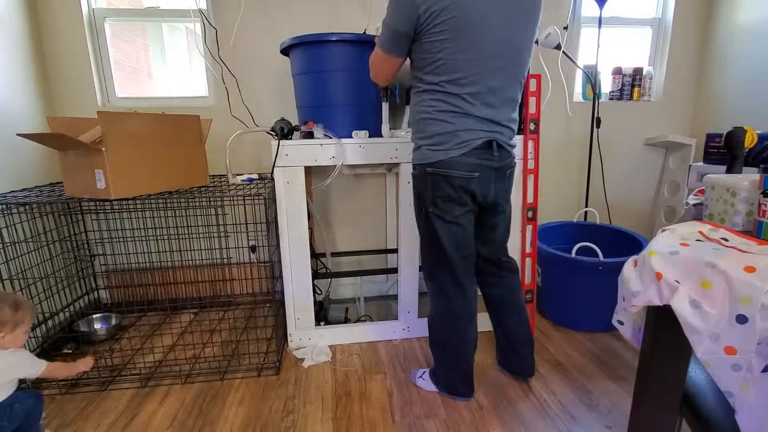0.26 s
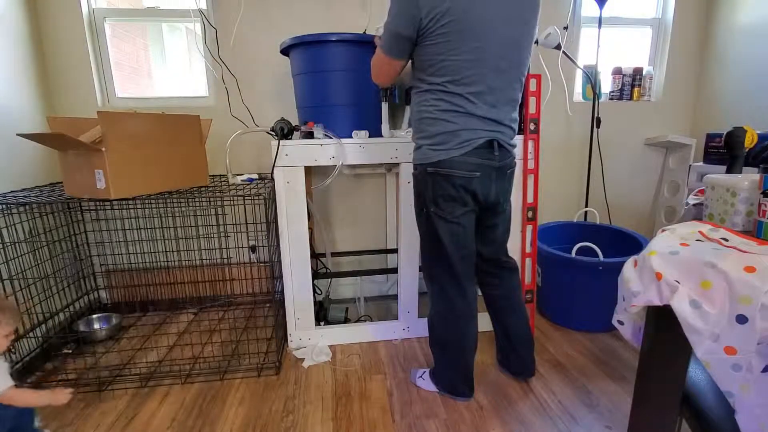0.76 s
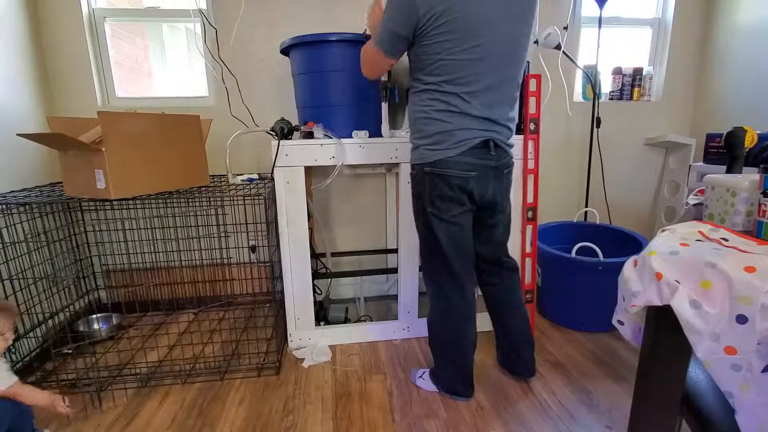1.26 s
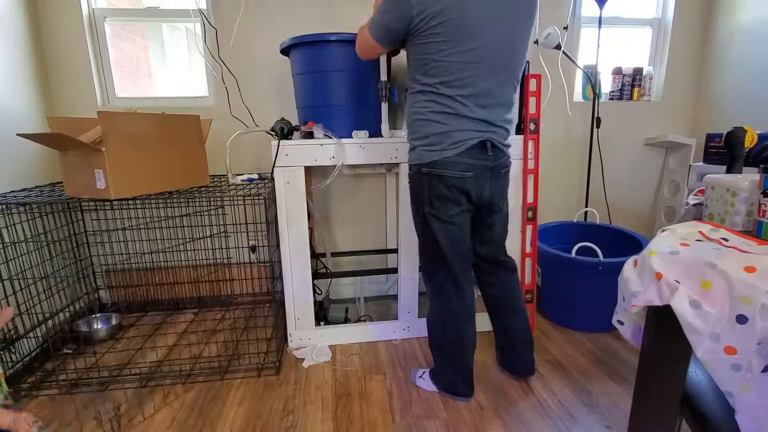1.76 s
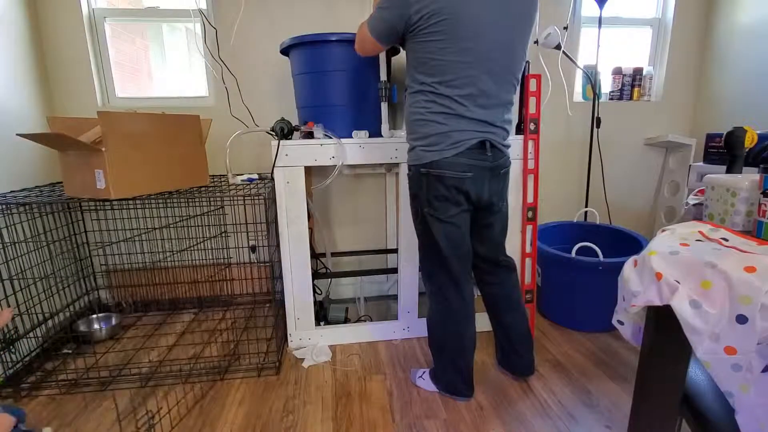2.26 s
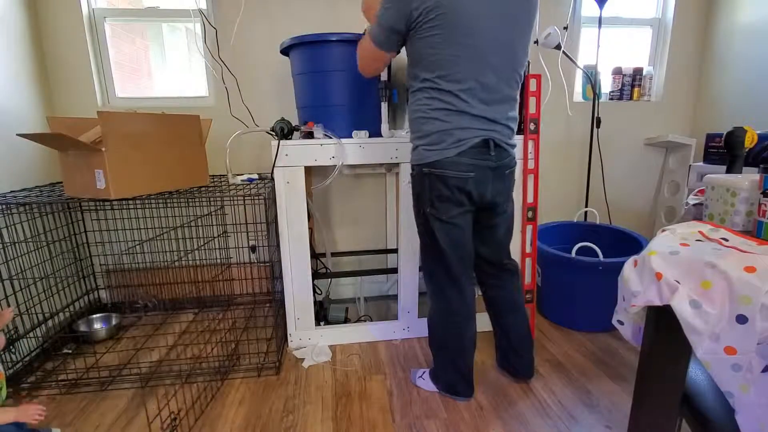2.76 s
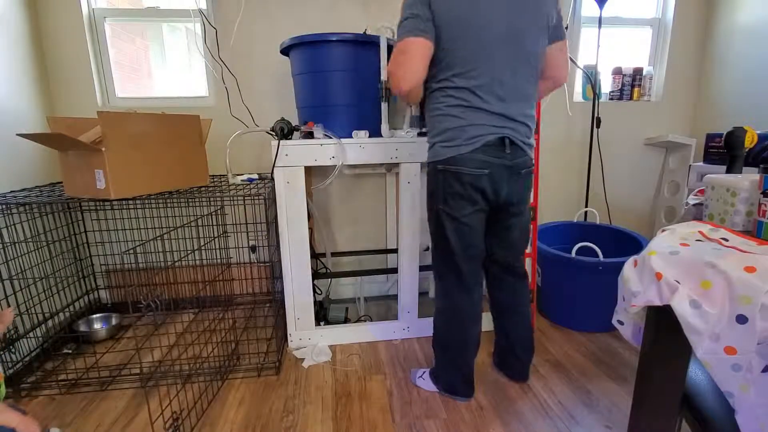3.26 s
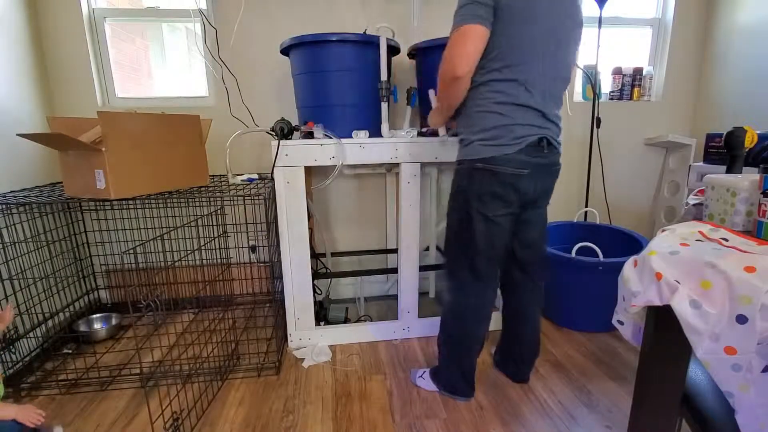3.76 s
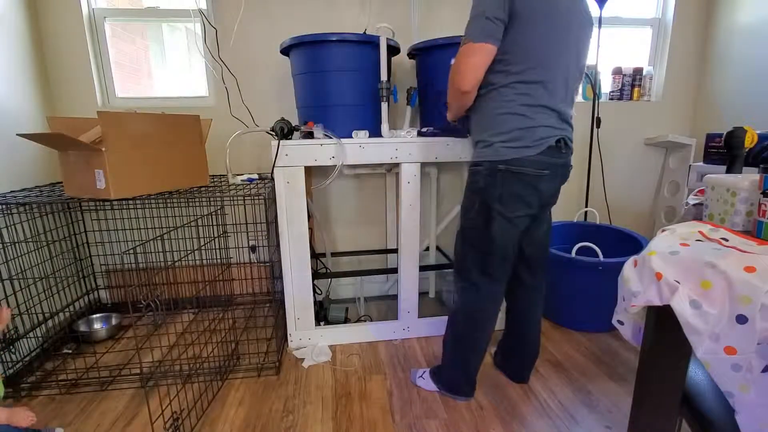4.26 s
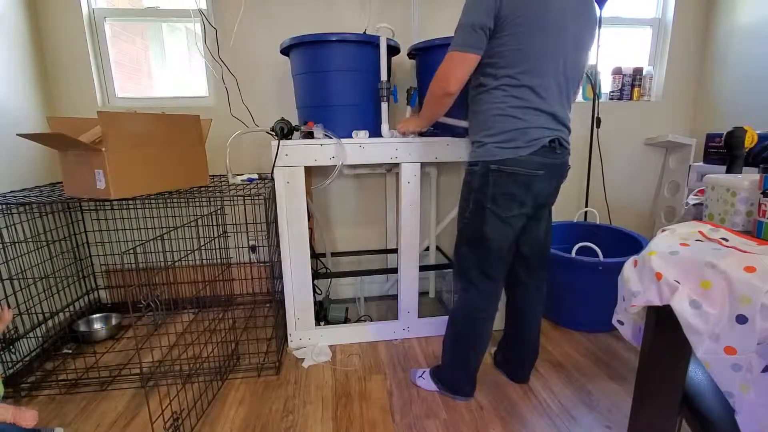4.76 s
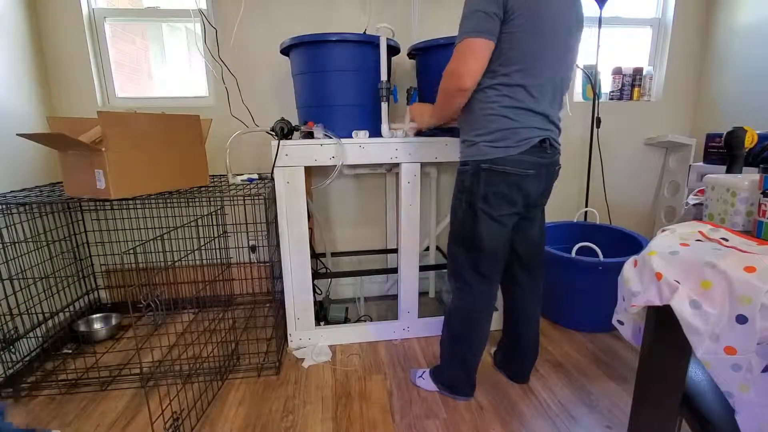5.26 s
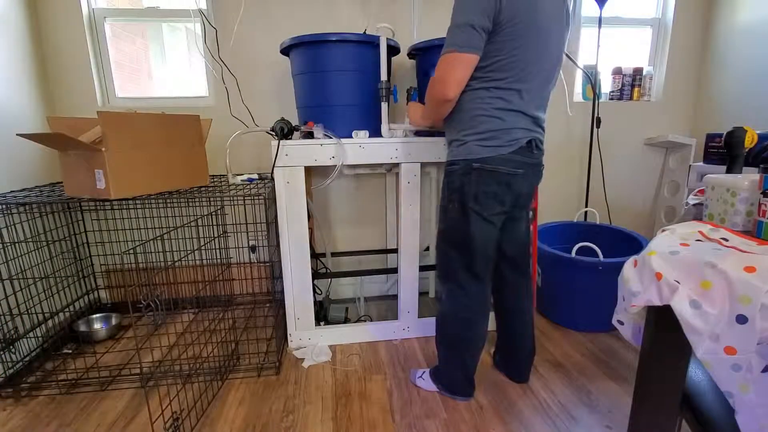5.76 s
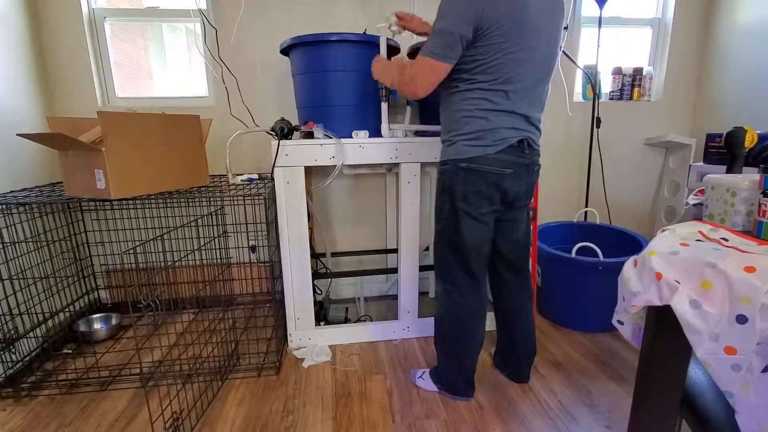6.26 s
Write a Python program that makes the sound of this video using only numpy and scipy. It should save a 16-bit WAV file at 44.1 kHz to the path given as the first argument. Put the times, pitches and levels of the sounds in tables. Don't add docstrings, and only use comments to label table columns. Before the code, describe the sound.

Rigid plastic pipes and fittings knock and clack onto a wooden stand in a bare lively room, with scuffing hands and a faint pump hum.

```python
import sys
import numpy as np
from scipy import signal
from scipy.fft import rfft, irfft
from scipy.io import wavfile
from scipy.ndimage import uniform_filter1d

SR = 44100
rng = np.random.default_rng(int(sys.argv[2]) if len(sys.argv) > 2 else 0)


def level_to_linear(level):
    exponent = np.asarray(level, float) / 20
    return 10 ** exponent


def transcribe(signal):
    frames = np.atleast_2d(signal).T
    limited = np.clip(frames, -1, 1)
    pcm = np.round(limited * 32767).astype(np.int16)
    wavfile.write(sys.argv[1], SR, pcm)


N = 287532

# (frequency [Hz], likeness [0-1])
CHANNEL_LIKENESS = [(60, 0.99), (200, 0.97), (500, 0.86), (900, 0.32), (1300, 0.081), (2000, 0.059),
                    (8000, .05), (15000, 0.034)]
HEAVY_EDGES_HZ = [100, 350, 1300, 3000, 8000]
TICK_EDGES_HZ = [1000, 2000, 3600, 6500, 13000]
# (level at zero hardness [dB], slope [dB per dB of hardness])
TICK_TOP = [(-0.8, 1.05), (-9, 0.19)]


def rms_one(x):
    return x / np.sqrt(np.mean(x ** 2) + 1e-30)


def at_hz(points, hz):
    table_hz, values = np.array(points).T
    return np.interp(np.log(hz), np.log(table_hz), values)


def band(x, low, high, order=2):
    return signal.sosfilt(signal.butter(order, [low, high], "band", fs=SR, output="sos"), x)


def drift(rate):
    r = np.exp(-80 * np.pi * rate / SR)
    steps = rng.standard_normal(N // 40 + 2002)
    slow = signal.lfilter([1], [1, -2 * r, r * r], steps)[2000:]
    return np.interp(np.arange(N) / 40, np.arange(len(slow)), rms_one(slow))


def swells(rows, floor_db):
    t = np.arange(0, N + 32, 32) / SR
    s, peak_db, rise_s, fall_s = np.transpose(rows)[:, :, None]
    level_db = peak_db - 20 * np.maximum((s - t) / rise_s, (t - s) / fall_s)
    return np.maximum(np.interp(np.arange(N) / SR, t, level_db.max(axis=0)), floor_db)


def diffuse(pairs, gain_db, first=0):
    edges_hz = 25 * 2 ** np.arange(0, 9.6, .5)
    # (frequency [Hz], left over right [dB])
    left_lean = [(60, 0.7), (180, 0.9), (550, 1), (1650, 0.3), (4970, 0.8), (15000, -1)]
    out = 0
    for k, (low, high) in enumerate(zip(edges_hz[first:], edges_hz[first + 1:])):
        mid, side = band(pairs[k % 2], low, high)
        hz = np.sqrt(low * high)
        alike = np.clip(at_hz(CHANNEL_LIKENESS, hz), 0, 1)
        lean = level_to_linear(at_hz(left_lean, hz) / 2 * np.array([[1], [-1]]))
        stereo = np.sqrt(1 + alike) * mid + np.sqrt(1 - alike) * side * [[1], [-1]]
        out = out + lean * level_to_linear(gain_db(hz)) * stereo
    return out


def room_level():
    # (time [s], level [dB])
    level_points = [(0.0, -38), (0.27, -40.5), (1.01, -42.5), (1.49, -40), (2.2, -41), (2.5, -40),
                    (2.91, -41.5), (4.1, -43), (4.65, -43.5), (4.83, -45.5), (5.9, -45.5), (6.52, -43.5)]
    s, level_db = np.transpose(level_points)
    return np.interp(np.arange(N) / SR, s, level_db)


def room_noise(level_db):
    # (frequency [Hz], level [dB per Hz])
    noise_spectrum = [(15, -56), (28, -54), (46, -2.5), (107, -3), (189, -7), (261, -15.5), (324, -13.5),
                      (352, -1), (486, -19), (527, -4), (620, -12.5), (769, -14), (1930, -40),
                      (2890, -38.5), (15800, -49.5)]
    # (peak time [s], peak level [dB], rise [s], fall [s])
    shakes = [
        (0.63, -35, 1.2, 1),
        (3.9, -30.5, 0.32, 0.12),
        (5.48, -32.5, 0.42, 0.21),
    ]
    lumps = drift(1.3)

    def gain_db(hz):
        return at_hz(noise_spectrum, hz) + 2.0 * lumps * (hz < 300) + 1.4 * drift(9)

    noise = diffuse(rng.standard_normal((2, 2, N)), gain_db)
    return level_to_linear(swells(shakes, level_db)) * rms_one(noise)


def pump_hum(level_db):
    # (frequency [Hz], width [Hz], rms level [dB])
    hum_lines = [(531.5, 4.2, -55.5), (441.5, 21, -55.5), (239.5, 9.1, -56.5), (168, 6, -66.5)]
    out = 0
    for hz, width, line_db in hum_lines:
        r = np.exp(-np.pi * width / SR)
        poles = [1, -2 * r * np.cos(2 * np.pi * hz / SR), r * r]
        shared, side = signal.lfilter([1, 0, -1], poles, rng.standard_normal((2, N)))
        out = out + level_to_linear(line_db) * rms_one(shared + 0.31 * side * [[1], [-1]])
    return out * level_to_linear(level_db + 47)


def scuffing(grains_per_s, grain_db):
    # (peak time [s], peak level [dB], rise [s], fall [s])
    strokes = [(0.045, -36, 0.92, 0.25), (0.168, -36, 0.16, 0.17), (0.316, -38, 0.13, 0.15),
               (0.764, -41, 0.57, 0.21), (0.934, -38, 0.069, 0.34), (1.35, -34.5, 0.23, 0.39),
               (1.51, -39.5, 0.33, 0.22), (1.62, -50, 0.044, 0.19), (1.84, -49, 0.053, 0.44),
               (2.13, -52, 0.051, 5.6), (2.56, -54, 2.3, 0.62), (2.678, -51.5, 0.3, 0.025),
               (2.832, -42.5, 0.16, .12), (2.99, -58, 0.081, .06), (3.044, -51, 0.063, 0.39),
               (3.2, -51, 0.22, 1.3), (3.486, -49.5, 0.13, .13), (3.56, -54, 0.55, 0.98),
               (4.1, -57, 4, .12), (4.4, -55, 0.19, 2.6), (4.695, -53.5, .08, 0.18),
               (4.862, -55.5, 0.29, .08), (5.114, -57.5, .15, 1.5), (5.77, -57, 0.037, 0.37),
               (6.22, -59, 0.46, .14), (6.304, -58, .03, 1.1), (6.41, -50, 0.25, 0.45)]
    # (frequency [Hz], level [dB per Hz])
    scuff_spectrum = [(300, 2.5), (700, 3), (1500, 0.5), (3000, 3.5), (5000, 3), (7500, -3), (11000, -1),
                      (15500, -2.5)]
    level_db = swells(strokes, floor_db=-62)
    bright_db = -4.5 + 0.1138 * (level_db + 48.5)
    sizes = level_to_linear(grain_db * np.minimum(rng.exponential(1, (2, 1, N)), 4))
    caught = rng.random((2, 1, N)) < grains_per_s / SR
    grains = rng.standard_normal((2, 2, N)) * (1 + sizes * caught)
    shared = drift(32)

    def gain_db(hz):
        tilt_db = bright_db * np.clip(np.log2(hz / 4000), -1, 2)
        return at_hz(scuff_spectrum, hz) + tilt_db + 0.89 * shared + 0.96 * drift(20)

    return level_to_linear(level_db + 0.53) * diffuse(grains / grains.std(), gain_db, first=7)


def thuds(rise_s):
    # (time [s], peak level [dB], frequency [Hz], 60 dB decay [s])
    board_thuds = [(0.461, -34, 108, 0.17), (0.775, -27.5, 168, 0.28), (1.009, -35, 165.7, 0.96),
                   (1.892, -33.5, 56.4, 0.36), (2.291, -23.5, 70.3, 0.81), (2.418, -25.5, 104, 0.33),
                   (2.679, -36, 253.5, 0.55), (3.389, -32.5, 59, 0.32), (3.769, -19.5, 158, 0.18),
                   (3.722, -25.5, 142, 0.28), (3.88, -20, 258.5, 0.24), (3.928, -13.5, 161.4, 0.125),
                   (4.4105, -29, 57.7, 0.4), (4.471, -38, 54.7, 0.19), (4.761, -40, 59, 0.58),
                   (5.411, -23.5, 202, 0.34), (5.43, -20.5, 146.5, 0.18), (2.405, -20.5, 530, 0.082),
                   (3.93, -15.5, 553, 0.072), (4.23, -37, 1500, 0.057), (5.621, -23, 626, 0.09),
                   (4.393, -34, 58, .2), (2.338, -22, 134, .12)]
    age, out = np.arange(SR) / SR, np.zeros(N + SR)
    for s, peak_db, hz, t60 in board_thuds:
        envelope = level_to_linear(peak_db - 60 * age / t60) * (1 - np.exp(-age / rise_s))
        out[round(s * SR):][:SR] += envelope * np.sin(2 * np.pi * hz * age)
    return out[:N]


def causal(magnitude):
    cepstrum = irfft(np.log(magnitude))
    half = len(cepstrum) // 2
    cepstrum[1:half] *= 2
    cepstrum[half + 1:] = 0
    return irfft(np.exp(rfft(cepstrum)))[:half]


def knocks(hits, modes, upper, edges_hz, bottom_db, top_db):
    hz = np.maximum(np.linspace(0, SR / 2, 4097), 10)
    mode_hz, width, mode_db = np.transpose(modes)[:, :, None]
    centres = np.sqrt(np.multiply(edges_hz[1:], edges_hz[:-1]))
    out = np.zeros(N + len(hz))
    for s, peak_db, heft_db, hard_db in hits:
        upper_db = [base_db + share * hard_db for base_db, share in upper]
        per_hz_db = [heft_db, 0, *upper_db] - 10 * np.log10(np.diff(edges_hz))
        lowest = (centres[0] / 4, per_hz_db[0] + bottom_db)
        highest = (16000, per_hz_db[-1] + top_db)
        broad_db = at_hz([lowest, *zip(centres, per_hz_db), highest], hz)
        strength = level_to_linear(2 * (mode_db + 0.91 * rng.standard_normal(mode_db.shape)))
        ringing = 1 + np.sum(strength / (1 + (2 * (hz - mode_hz) / width) ** 2), axis=0)
        pulse = causal(level_to_linear(peak_db + broad_db + 54.5) * np.sqrt(ringing))
        pulse -= 0.5 * np.roll(pulse, rng.integers(60, 200))
        out[round(s * SR):][:len(pulse)] += pulse
    return out[:N]




def small_ticks():
    # (time [s], peak level [dB], heft [dB], hardness [dB])
    tick_hits = [(0.9303, -35.5, 1, -20), (1.631, -32, -33, 0.5), (1.6624, -47, -25, -9),
                 (1.8317, -64, 0, 21), (2.146, -42.5, -8, 11), (2.2476, -46, 7, -5), (2.808, -53.5, 18, 20),
                 (2.22, -47, -1, 8), (3.358, -43, 2, 6.5), (4.2297, -54.5, 11, -21.5),
                 (4.415, -38.5, -7, 2.5), (5.7694, -64, 1.5, -5), (5.85, -49, 2, -18),
                 (6.031, -54.5, -14, 4), (6.1274, -53.5, -6, 6.5), (6.4092, -64, 28, 15)]
    # (frequency [Hz], width [Hz], level [dB])
    part_modes = [(1620, 34, 0), (2700, 590, -5), (4000, 48, 4), (4360, 290, 3.5), (6770, 150, 4)]
    return knocks(tick_hits, part_modes, TICK_TOP, TICK_EDGES_HZ, bottom_db=-29, top_db=2.5)


def clip_pings():
    # (time [s], peak level [dB], heft [dB], hardness [dB])
    ping_hits = [
        (3.209, -49, -11, 18.8),
        (2.9846, -68, -4, 24),
    ]
    # (frequency [Hz], width [Hz], level [dB])
    clip_modes = [(4100, 38, 14.5), (4540, 90, 0), (5600, 250, -5), (6870, 230, 9.5)]
    return knocks(ping_hits, clip_modes, TICK_TOP, TICK_EDGES_HZ, bottom_db=-22, top_db=-3.5)


def bucket():
    # (time [s], force [dB], heft [dB], hardness [dB])
    bucket_hits = [
        (2.281, -25.5, 4, -7),
        (2.2895, -20.5, 4.5, -7),
        (2.309, -18.5, -4, -47),
        (2.334, -39, 19, -5),
        (2.68, -31.5, -3, -39),
        (2.749, -29.5, -8, -35),
        (2.828, -33.5, 7, -39),
    ]
    # (time [s], force [dB], heft [dB], hardness [dB])
    rim_rattles = [
        (2.389, -29.5, 9.5, -22),
        (2.411, -23.5, -12, -28.5),
        (2.548, -46, -5, -8),
    ]
    # (frequency [Hz], width [Hz], level [dB])
    bucket_modes = [(450, 39, 7.6), (610, 32, 4), (2700, 130, 2.1), (4050, 640, 10), (5160, 390, 8.2),
                    (6750, 490, 9), (12200, 2100, 1.9)]
    # (level at zero hardness [dB], slope [dB per dB])
    bucket_top = [(-2.5, 0.19), (3.5, 1)]
    # (level at zero hardness [dB], slope [dB per dB])
    rim_top = [(15.3, 0.83), (0.3, .98)]
    return (knocks(bucket_hits, bucket_modes, bucket_top, HEAVY_EDGES_HZ, bottom_db=-1, top_db=0.5)
            + knocks(rim_rattles, bucket_modes, rim_top, HEAVY_EDGES_HZ, bottom_db=-12, top_db=-22))


def sleeve():
    # (time [s], force [dB], heft [dB], hardness [dB])
    sleeve_hits = [
        (0.448, -39.5, 19, -28),
        (0.498, -18.5, -3, -11.5),
        (0.51, -22.5, -17.5, 3.5),
        (0.523, -23.5, -14, 2),
        (0.538, -23.5, 2, 4),
        (0.641, -23, -47.5, -3.5),
        (1.011, -27.5, 2, -17),
    ]
    # (frequency [Hz], width [Hz], level [dB])
    sleeve_modes = [(614, 60, 4), (800, 160, 2), (1320, 400, -1.5), (2300, 540, -0.5), (6300, 230, -9),
                    (6700, 420, 3), (9370, 490, 2.5), (10600, 330, 5.5)]
    # (level at zero hardness [dB], slope [dB per dB])
    sleeve_top = [(-2, 0.6), (-1.6, 0.65)]
    return knocks(sleeve_hits, sleeve_modes, sleeve_top, HEAVY_EDGES_HZ, bottom_db=-22, top_db=-21.5)


def fitting_snaps():
    # (time [s], force [dB], heft [dB], hardness [dB])
    snap_hits = [
        (0.589, -29.5, -5.5, 13),
        (0.5905, -36, -7, 13.5),
        (0.594, -30, -3, 16.5),
        (0.619, -23, -8.5, -3),
    ]
    # (frequency [Hz], width [Hz], level [dB])
    fitting_modes = [(610, 60, 1.5), (810, 150, 3.5), (3400, 500, 3), (4400, 187, -1), (6300, 230, -8.5),
                     (6700, 420, 4.5), (9370, 490, 5.5), (10600, 330, 6.5)]
    # (level at zero hardness [dB], slope [dB per dB])
    snap_top = [(-6.5, 0.57), (1.05, 0.9449)]
    return knocks(snap_hits, fitting_modes, snap_top, HEAVY_EDGES_HZ, bottom_db=-7, top_db=-2.0)


def stand():
    # (time [s], force [dB], heft [dB], hardness [dB])
    stand_hits = [
        (3.715, -26.5, 2.5, -26),
        (3.716, -16.5, -0.5, -22.5),
        (3.73, -24.5, -4, -37),
        (3.779, -36.5, 21, -6),
        (3.803, -23.5, 4, -7.5),
        (3.821, -14, -7, -9),
        (4.559, -28, -19, -24),
        (4.58, -29.5, -2, -24.5),
        (4.693, -35.5, 0.5, -24),
    ]
    # (frequency [Hz], width [Hz], level [dB])
    stand_modes = [(259, 13, 16.4), (496, 47, 7.8), (680, 22, 1.7), (810, 67, 4.8), (1470, 200, 2.2),
                   (2180, 170, 1.7), (2500, 1340, 3.4)]
    # (level at zero hardness [dB], slope [dB per dB])
    stand_top = [(0, 0.59), (-2, 0.93)]
    return knocks(stand_hits, stand_modes, stand_top, HEAVY_EDGES_HZ, bottom_db=-32, top_db=-36)


def valve():
    # (time [s], force [dB], heft [dB], hardness [dB])
    valve_hits = [
        (3.875, -10.5, -1.5, -10.5),
        (3.885, -16, -0.5, -32),
        (3.891, -27.5, 14.5, 11.5),
        (3.933, -40, 7, 12),
    ]
    # (frequency [Hz], width [Hz], level [dB])
    valve_modes = [(253.6, 26, 3), (580, 97, 2.8), (955, 48, 8.8), (1050, 71, 10), (1340, 71, 6.2),
                   (3100, 400, 8.2), (4370, 44, 10), (4920, 51, 6.1), (5730, 83, 10.3), (9300, 250, 2.4),
                   (10300, 830, 4.2)]
    # (level at zero hardness [dB], slope [dB per dB])
    valve_top = [(-4.5, 0.23), (-2.5, 1.25)]
    return knocks(valve_hits, valve_modes, valve_top, HEAVY_EDGES_HZ, bottom_db=-14.0, top_db=-5.0)


def pipes():
    # (time [s], force [dB], heft [dB], hardness [dB])
    pipe_hits = [(5.202, -47, 1, -33), (5.299, -26.5, -30, -22.5), (5.3115, -20, -20, -10),
                 (5.334, -14.5, -12.5, -24), (5.3755, -15.5, 5, 0.5), (5.379, -25, 2, -6),
                 (5.394, -46, -14, -30), (5.448, -17, -4.5, -7.5), (5.456, -14, -29.5, -22),
                 (5.499, -20, -41, -18.5), (5.539, -38.5, 8, -28), (5.58, -30, -6, -22),
                 (5.596, -29.5, -16, -24), (5.618, -22, -6, -35), (5.659, -49.5, 17, -8)]
    # (frequency [Hz], width [Hz], level [dB])
    pipe_modes = [(506, 90, 6.2), (610, 69, 4.2), (940, 86, 6.2), (980, 230, 8.3), (1380, 260, 5.2),
                  (1500, 92, 3.3), (1680, 48, 4.4), (2150, 93, 9.5), (2530, 115, 3), (2726, 70, 7.2),
                  (4500, 230, 2.3), (5500, 410, 3.4), (6300, 430, 8.3), (7050, 270, 9.7)]
    # (level at zero hardness [dB], slope [dB per dB])
    pipe_top = [(5.5, 0.79), (-1, 0.95)]
    return knocks(pipe_hits, pipe_modes, pipe_top, HEAVY_EDGES_HZ, bottom_db=-24, top_db=-15.0)


def clear_rings(rise_s, twin_share, split_hz):
    # (time [s], peak level [dB], frequency [Hz], 60 dB decay [s])
    struck_rings = [(5.201, -33.5, 525, .06), (5.299, -35, 854, .06), (5.312, -23, 895, 0.23),
                    (5.314, -26, 1254, 0.11), (5.335, -18.5, 580, 0.15), (5.34, -25, 910, 0.17),
                    (5.378, -22, 1650, 0.2), (5.378, -24, 1340, 0.17), (5.378, -15, 846, 0.12),
                    (5.38, -27, 950, 0.27), (5.38, -13.5, 1680, 0.095), (5.382, -25, 584, 0.12),
                    (5.39, -33, 2100, .15), (5.378, -44, 2700, 0.1), (5.378, -28, 6300, 0.14),
                    (5.449, -16, 1527, 0.13), (5.452, -17.5, 574, 0.069), (5.456, -22.5, 915, 0.41),
                    (5.46, -25, 2050, 0.23), (5.478, -22, 1438, 0.15), (5.45, -24, 2760, 0.11),
                    (5.54, -24, 943, 0.085), (5.62, -34, 953, .1),
                    (3.715, -23, 653, 0.18), (3.72, -20.5, 253.6, 0.38), (3.722, -25.5, 530, 0.3),
                   (3.721, -34.5, 1440, 0.062), (3.805, -27, 1100, .08), (3.822, -22, 1443, .1),
                   (3.822, -30, 2500, .08), (3.876, -14.5, 1100, 0.12), (3.878, -15, 895, 0.16),
                   (3.876, -23, 3195, 0.12), (3.88, -21, 1335, 0.22), (3.89, -35, 5710, 0.2),
                   (3.9, -29, 527, 0.24), (3.89, -38, 6500, .2), (3.94, -38, 3030, .2),
                   (4.558, -43, 1500, .06), (4.558, -37, 800, 0.18), (4.585, -38, 500, .12),
                   (4.625, -44, 401, 0.47), (4.694, -44.5, 1014, 0.13), (4.7, -50, 748, .25),
                    (2.28, -24, 624, 0.26), (2.292, -19.5, 639, 0.19), (2.29, -20.5, 457, 0.39),
                    (2.3, -25, 253, 0.45), (2.31, -24.5, 168, 0.3), (2.285, -33, 2820, 0.13),
                    (2.285, -33, 2150, 0.11), (2.31, -30.5, 1320, 0.16), (2.32, -36, 940, 0.33),
                    (2.386, -27.5, 1810, .06), (2.394, -32, 1250, .06), (2.405, -25, 480, 0.1),
                    (0.498, -29, 761, 0.11), (0.515, -35, 660, 0.13), (0.59, -36, 6660, .1),
                   (0.591, -31, 4400, .08), (0.592, -32, 5660, .08), (0.595, -42.5, 2980, .15),
                   (0.592, -38, 10350, .15), (3.24, -52, 3270, 0.18), (3.3, -56, 4750, .19),
                   (3.208, -60, 6700, .3), (3.23, -58, 5760, .2), (3.358, -38, 2590, .03),
                   (3.358, -46, 4300, .04), (4.416, -50, 2080, .15), (4.416, -47, 3500, .08),
                   (4.416, -50, 2650, .04),
                    (3.208, -47, 4090, .3), (3.238, -49, 4160, .3), (3.222, -48, 4850, .2),
                  (3.909, -27, 4355, .2), (4.012, -43, 4355, .15), (5.375, -14, 2350, .08),
                  (5.375, -14, 1580, .07), (3.718, -24, 560, .12), (5.621, -16, 600, .09),
                  (4.693, -44, 950, .12),
                    (1.624, -41, 4100, .08), (1.631, -40, 3930, .06), (1.632, -43, 5900, 0.097),
                  (1.633, -41, 3296, .12), (1.655, -49, 4250, 0.1), (1.663, -44, 3670, 0.18),
                  (1.831, -47, 4790, .15), (1.832, -49, 5000, .12), (1.835, -54, 2300, 0.1),
                  (2.142, -51, 4400, .05), (2.147, -36, 4440, .08), (2.148, -46, 5100, .06),
                  (2.15, -46, 2700, 0.095), (2.165, -51, 6230, .12), (2.222, -43, 4500, .07),
                  (2.218, -45, 3600, .08), (5.312, -21, 620, 0.085), (5.311, -48, 2140, .15),
                  (5.311, -32, 4920, 0.11), (6.407, -60, 5100, 0.055), (6.408, -48, 7000, .08),
                  (6.453, -56, 4550, .05), (6.328, -51, 7200, .05), (6.128, -55.5, 6300, .06),
                    (3.7, -54, 4355, .15), (3.881, -15.5, 590, 0.16), (3.915, -22, 520, .12),
                    (3.714, -22.5, 546, .09), (3.745, -23, 420, 0.091), (3.95, -40, 3060, .15),
                    (3.893, -27, 5050, .1), (5.617, -27, 1150, .05), (5.597, -28, 590, .06),
                    (5.659, -31, 600, 0.085), (5.53, -24, 960, .06), (5.1, -32, 520, .06),
                    (5, -42, 2500, .03), (4.692, -50, 1350, .06), (0.285, -42, 1800, .25),
                    (0.445, -47.5, 2200, .15), (5.297, -37, 710, .05), (3.82, -29, 2900, 0.037),
                    (4.445, -50, 2100, .06), (2.306, -22.5, 560, .12), (2.408, -26, 600, .05),
                    (2.352, -21, 450, .1), (0.512, -33, 870, .15), (0.59, -32.5, 3250, .12),
                    (0.61, -33.5, 4400, .15), (0.591, -32, 5780, .1), (3.803, -30, 3500, .04),
                    (1.629, -45, 2800, 0.037)]
    rows = struck_rings
    t, out = np.arange(SR // 2) / SR, np.zeros((2, N + SR))
    for (s, peak_db, hz, t60), (split, side, turn) in zip(rows, rng.random((len(rows), 3))):
        spread = np.arccos(np.clip(at_hz(CHANNEL_LIKENESS, hz), 0, 1))
        gap = spread * 0.32 * np.sign(side - 0.5) * np.array([[1], [-1]])
        twin_hz = hz + split_hz * (split + 0.5)
        mode = np.sin(2 * np.pi * hz * t + gap)
        twin = np.sin(2 * np.pi * (twin_hz * t + turn) - gap)
        envelope = level_to_linear(peak_db - 60 * t / t60) * (1 - np.exp(-t / rise_s))
        out[:, round(s * SR):][:, :len(t)] += envelope * (mode + twin_share * twin)
    return out[:, :N]


def room(x, wet_db, build_s, early_db, early_s, even_hz):
    # (frequency [Hz], 60 dB decay [s])
    decay_times = [(60, 0.14), (250, 0.37), (1000, 0.37), (4000, 0.34), (12000, 0.25)]
    t = np.arange(SR * 3 // 4) / SR
    noise = rng.standard_normal((2, 2, len(t)))
    echoes = diffuse(noise, lambda hz: -60 * t / at_hz(decay_times, hz), first=3)
    echoes *= (1 - np.exp(-t / build_s)) * level_to_linear(early_db * np.exp(-t / early_s))
    spectrum = rfft(echoes, SR)
    power = np.abs(spectrum.sum(axis=0)) ** 2 + np.abs(spectrum[0] - spectrum[1]) ** 2 / 4
    broad = uniform_filter1d(power, int(even_hz))
    echoes = irfft(spectrum / np.sqrt(broad + 1e-3 * broad.mean()), SR)[:, :len(t)]
    echoes *= level_to_linear(wet_db) / np.sqrt(np.mean(np.sum(echoes ** 2, axis=1)))
    echoes[:, [0, 37, 88]] += 0.44 * np.array([1, -0.9, 0.7])
    return signal.fftconvolve(x[None], echoes, axes=1)[:, :N]


def scene():
    noise_db = room_level()
    background = room_noise(noise_db) + pump_hum(noise_db)
    handling = scuffing(grains_per_s=790, grain_db=-1.5) + thuds(rise_s=0.0042)
    struck = small_ticks() + clip_pings() + bucket() + sleeve() + fitting_snaps() + stand() + valve() + pipes()
    heard = room(struck, wet_db=10.5, build_s=0.0019, early_db=5.0, early_s=0.0061, even_hz=85.4)
    ringing = clear_rings(rise_s=0.0019, twin_share=0.5, split_hz=27.1)
    return background + handling + heard + ringing


def top_cut(x):
    return signal.sosfilt(signal.butter(12, 16800, fs=SR, output="sos"), x)


def record(dry):
    rounded = 1.2 * np.tanh(dry / 1.2)
    low_pass = signal.ellip(10, 0.5, 60, 15800, fs=SR, output="sos")
    mix = signal.sosfilt(low_pass, rounded)
    return top_cut(mix)


dry = scene()
out = record(dry)
transcribe(out)
```